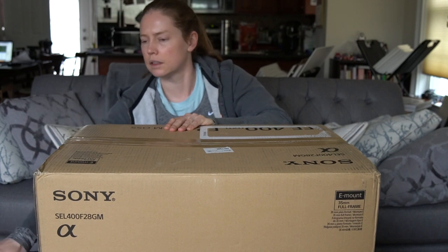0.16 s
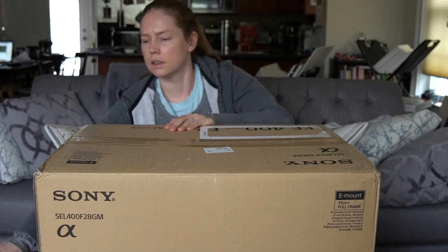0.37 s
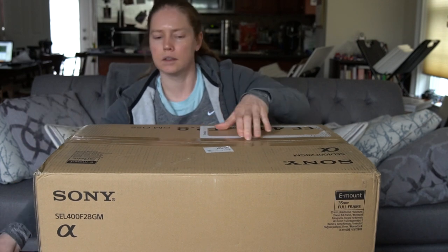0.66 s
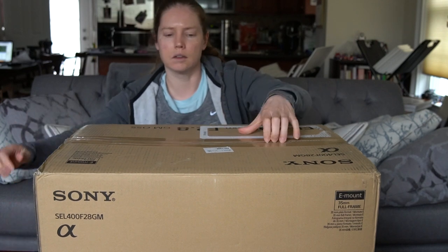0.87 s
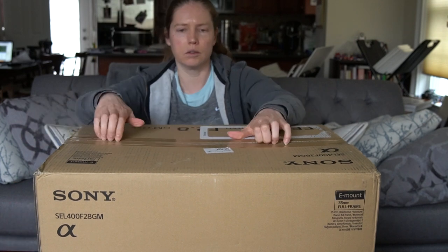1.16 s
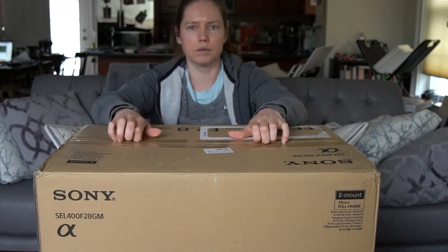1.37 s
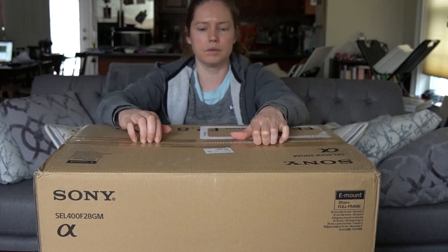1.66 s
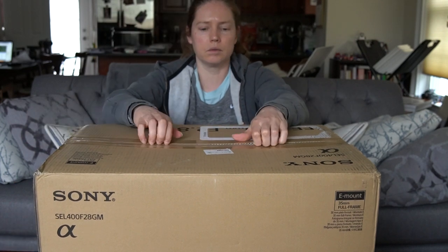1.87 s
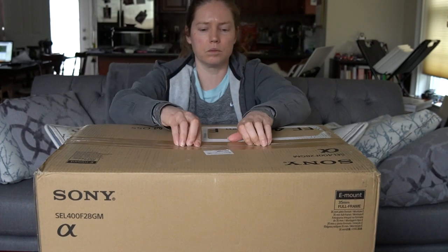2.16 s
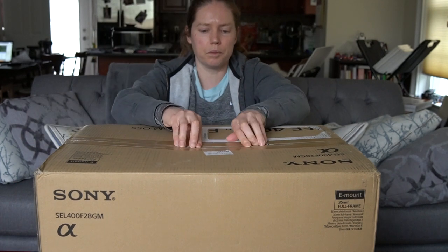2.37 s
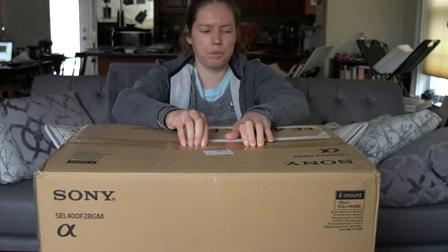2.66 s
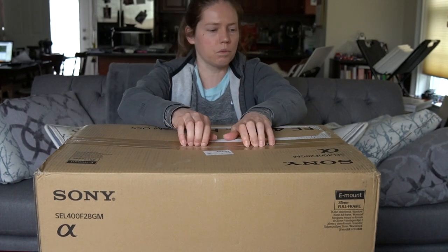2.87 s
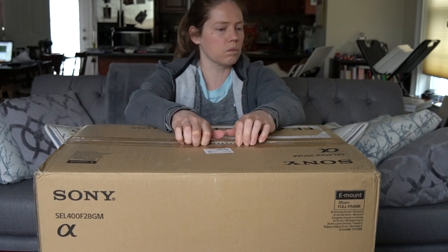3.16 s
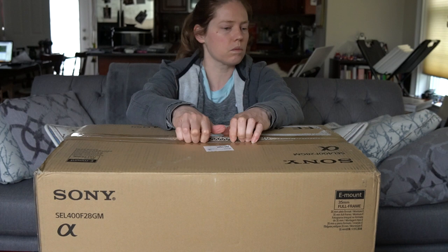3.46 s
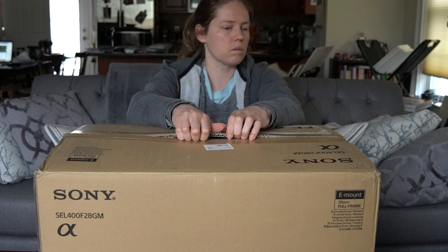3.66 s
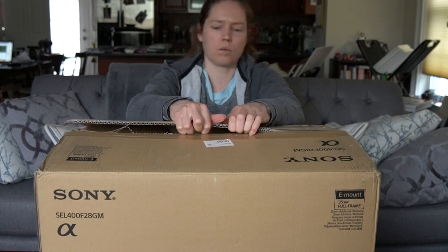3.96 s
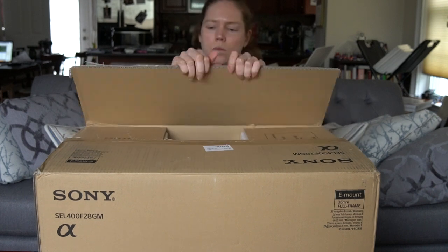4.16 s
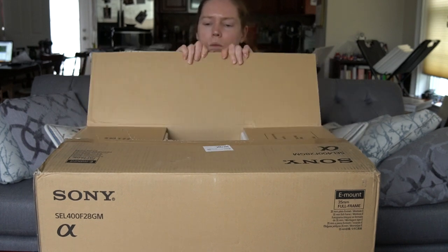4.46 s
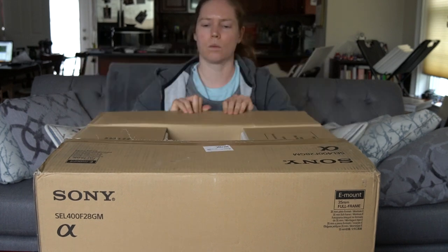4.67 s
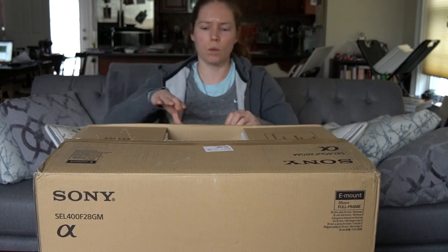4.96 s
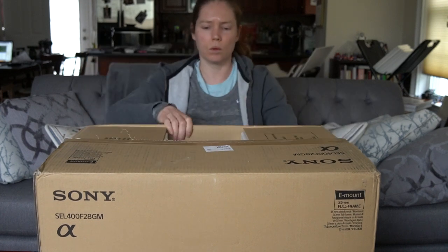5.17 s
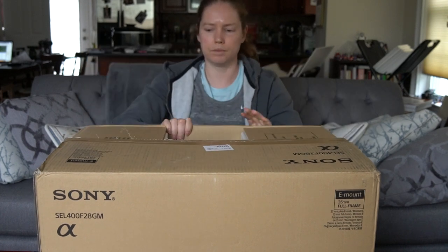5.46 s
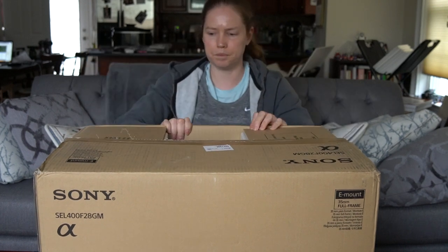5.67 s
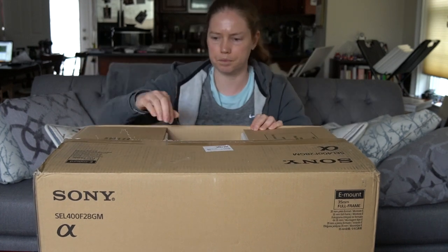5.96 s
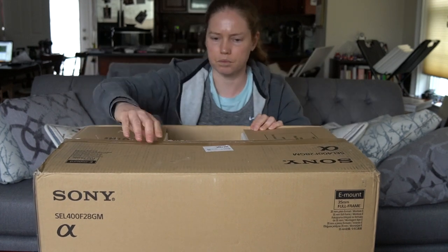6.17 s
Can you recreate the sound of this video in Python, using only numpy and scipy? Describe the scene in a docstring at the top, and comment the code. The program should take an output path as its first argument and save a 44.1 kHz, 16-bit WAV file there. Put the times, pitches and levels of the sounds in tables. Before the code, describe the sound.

Close indoor unboxing: light taps, sputtering tape crackles, a burst of sharp snaps and booming rips near four seconds, then quiet rustles.

```python
"""A large taped cardboard box is opened by hand in a living room, over still air, a deep rumble and a hum.
After small ticks beside the box, hands knock on the lid (dents, ringing plate modes, a low thud) and work
along the seam (filtered random clicks); the packing tape crackles, snaps as short fractures that shake the
panels, and rips in rushes of slips while the air inside booms. Then the flap is folded back, and sleeves
and fingers rub and tap on the cardboard (stick-slip noise, light touches)."""
import sys
import numpy as np
from scipy import signal
from scipy.fft import rfft, irfft
from scipy.io import wavfile

SR = 44100
rng = np.random.default_rng(int(sys.argv[2]) if len(sys.argv) > 2 else 0)


def master_out(mix):
    """Clip the mix to full scale and print it as 16-bit PCM to the path in sys.argv[1]."""
    frames = np.transpose(np.atleast_2d(mix))
    ceiling = np.clip(frames, -1, 1)
    pcm = np.round(ceiling * 32767).astype(np.int16)
    wavfile.write(sys.argv[1], SR, pcm)


N = 278138

# Levels of events and spectra are relative: each sound may add a fixed trim or normalise its sum. # fingers
# brushing the lid, then working along the taped seam: (start [s], end [s], crinkle level [dB])
SEAM_STROKES = [(0.502, 0.574, -59.5), (0.762, 0.865, -58), (0.974, 1.03, -60.5), (1.094, 1.335, -57.5),
                (1.336, 1.395, -52.5), (1.559, 1.66, -57.5), (1.716, 1.847, -48), (1.915, 2.219, -53.5),
                (2.604, 2.723, -57), (2.983, 3.282, -50.5), (3.285, 3.374, -44.5), (3.39, 3.608, -51),
                (3.657, 3.756, -40.5), (4.275, 4.343, -57.5)]
# fingers, hands and flap knocking on the cardboard:
# (time [s], panel flex level over 5 ms [dB], flex pitch [Hz])
LID_KNOCKS = [(0.5622, -22.5, 684), (0.6643, -27.5, 550), (0.6685, -16.5, 496), (0.687, -18, 730),
              (0.7795, -31.5, 446), (0.851, -39, 453), (1.0238, -38, 310), (1.1019, -36.5, 420),
              (1.16, -30, 298.5), (1.1767, -35, 357), (1.3459, -28, 394), (1.4252, -29, 244),
              (1.591, -33, 413), (1.887, -34, 456.3), (2.048, -36, 358), (2.6859, -21.5, 341),
              (3.0549, -35, 650), (3.4756, -33, 490), (3.6412, -34.5, 460), (3.6874, -25, 483),
              (3.813, -21.5, 450), (4.0783, -18, 453), (4.1145, -16, 378), (4.637, -42.5, 396),
              (4.8856, -38, 430), (5.513, -42.5, 181), (5.644, -37.5, 186), (5.698, -40, 348),
              (5.8182, -48.5, 870), (6.01, -44.5, 280), (6.0696, -44.5, 401), (6.259, -42, 370)]
# loud tape snaps: (time [s], crack of the film over 1 ms [dB], clack of the liner over 1 ms [dB],
# jolt of the panel over 5 ms [dB])
TAPE_SNAPS = [(1.236, -29.5, -43, -40.5), (1.2576, -37, -29.5, -47), (1.6608, -18, -27.5, -28),
              (1.7253, -23.5, -33.5, -28.5), (1.797, -22.5, -30, -33.5), (1.8252, -24, -29.5, -35),
              (1.8385, -21.5, -19.5, -15), (1.9514, -33, -32.5, -29), (2.182, -32.5, -31.5, -32.5),
              (2.186, -24.5, -31, -37.5), (2.3597, -19.5, -19.5, -28), (2.3679, -15.5, -22.5, -21.5),
              (2.6638, -31, -30.5, -26.5), (2.729, -26.5, -29, -34), (2.9183, -29.5, -36.5, -40.5),
              (3.0046, -36, -45, -40), (3.0363, -36, -40, -34.5), (3.0415, -20, -26, -30.5),
              (3.096, -21.5, -30.5, -25.5), (3.1867, -33, -32.5, -25), (3.2345, -20, -29, -46),
              (3.2467, -25, -27.5, -43), (3.3203, -27, -28.5, -35), (3.3481, -30.5, -34.5, -37),
              (3.4683, -31, -28.5, -38.5), (3.52, -18.5, -30, -46.5), (3.5547, -18.5, -26.5, -41),
              (3.559, -21, -22.5, -36.5), (3.5829, -29, -31.5, -42.5), (3.7185, -26.5, -23, -42.5),
              (3.7391, -12.5, -14.5, -27.5), (3.7571, -21, -21.5, -30), (3.764, -17, -29, -35),
              (3.8044, -23, -21, -31.5), (3.8211, -14.5, -14, -19), (3.8431, -18, -24.5, -30),
              (3.8618, -24.5, -26, -35), (3.8728, -11, -10, -18), (3.8805, -16, -14.5, -17.5),
              (3.94, -25.5, -23, -21.5), (4.0387, -26, -43, -43.5), (4.0633, -16, -19.5, -28.5),
              (4.0738, -7, -5, -7), (4.0947, -25.5, -14.5, -23), (4.207, -33, -29.5, -33),
              (4.2914, -34, -31.5, -48)]
# resonant modes of the panels: (frequency [Hz], level [dB], T60 [s])
PLATE_MODES = [(178.3, 1.5, 0.21), (232.5, -3.5, 0.37), (300.7, 3, 0.18), (345.6, -1.5, 0.11),
               (422, -14.5, .11), (719.4, -7, 0.12), (825.5, -12.5, 0.08), (990, -2.5, 0.077),
               (1384, -15, 0.11)]
# spectrum of tape film cracking: (frequency [Hz], density [dB per Hz])
CRACK_SPECTRUM = [(2500, -28.5), (4500, -8), (6500, 1.5), (8500, 1.5), (16000, -9.5)]
# spectrum of the liner or a hard contact clacking: (frequency [Hz], density [dB per Hz])
CLACK_SPECTRUM = [(500, -19.5), (1100, -1), (1600, -4), (2800, -2.5), (4800, -2.5), (6500, -14),
                  (12000, -22)]
# spectrum of crinkling tape and tearing fibres: (frequency [Hz], density [dB per Hz])
CRINKLE_SPECTRUM = [(600, -19), (1300, 6), (2500, -7), (4500, -1), (8000, 0.5), (16000, -6)]


def from_db(db):
    """The decibel is logarithmic: 20 dB is a factor of ten in amplitude."""
    return np.exp(np.asarray(db) * (np.log(10) / 20))


def rms_one(x):
    """Normalise the mean power, so that rms is 1."""
    return x / np.sqrt(np.mean(x ** 2) + 1e-20)


def packed(x, span):
    """Normalise a pulse to the energy of rms 1 held for span seconds."""
    return x * np.sqrt(span * SR / (np.sum(x ** 2) + 1e-20))


def seconds(length):
    """Time axis sampled at SR."""
    return np.arange(int(length * SR)) / SR


def at_hz(points, hz):
    """Interpolate a table on a logarithmic frequency axis, as pitch is heard."""
    f, value = np.transpose(points)
    return np.interp(np.log(np.maximum(hz, 1)), np.log(f), value)


def gains(rows):
    """Level curves, linear in decibels, as gains that fade out beyond their ends."""
    s, *columns = np.transpose(rows)
    t = np.arange(N) / SR
    inside = np.interp(t, [s[0] - .04, s[0], s[-1], s[-1] + .04], [0, 1, 1, 0])
    return [inside * from_db(np.interp(t, s, c)) for c in columns]


def add(track, s, sound):
    """Superpose a sound at time s."""
    i = max(round(s * SR), 0)
    track[i:i + len(sound)] += sound[:max(N - i, 0)]


def colour(x, spectrum):
    """Minimum-phase filter: folding the cepstrum makes the given spectrum causal."""
    size = 1024 if len(x) < 4096 else 4096 if len(x) < SR else 32768
    log_gain = at_hz(spectrum, np.fft.rfftfreq(size, 1 / SR)) * np.log(10) / 20
    cepstrum = irfft(log_gain)
    cepstrum[1:size // 2] *= 2
    cepstrum[size // 2 + 1:] = 0
    response = irfft(np.exp(rfft(cepstrum)))
    return signal.fftconvolve(x, response)[:len(x)]


def drift(rate):
    """Slow random modulation: bounded noise values, rate per second, joined by straight lines."""
    values = np.clip(rng.standard_normal(4096), -2, 1.5)
    return np.interp(np.arange(N) / SR * rate, np.arange(4096), values)


def ring(t, hz, t60, phase=0):
    """Free decay of a damped resonator: a sine that loses 60 dB in t60."""
    return np.sin(2 * np.pi * hz * t + phase) * from_db(-60 * t / t60)


def grains(per_s, spread_db, size):
    """Shot noise: random clicks of uneven size, rms 1."""
    born = rng.random(size) < per_s / SR
    excess = np.minimum(rng.exponential(1, size), 4)
    return rms_one(born * rng.choice([-1, 1], size) * from_db(spread_db * excess))


def background():
    """Steady noise floor: still room air, a deep wavering rumble and a faint pure hum."""
    # still air: (frequency [Hz], density [dB per Hz])
    air_spectrum = [(40, -9.5), (75, 0.5), (125, -11.5), (210, 1), (300, -5.5), (400, -8.5), (600, -7.5),
                    (1000, -16.5), (3000, -28), (12000, -39)]
    # swell of the deep rumble: (time [s], level [dB])
    rumble_swell = [(0, -1.5), (2.4, 9), (2.9, 14), (3.3, 5.5), (4.9, 1), (5.35, 15), (5.8, 7.5),
                    (6.3, 13.5)]
    air_db, rumble_db, hum_hz, hum_db = -62, -64, 384, -69.5
    air = from_db(air_db) * rms_one(colour(rng.standard_normal(N), air_spectrum))
    deep_spectrum = [(5, -13.5), (17, 2.5), (32, -9.5), (70, -18.5), (130, -36.0), (600, -77.5)]
    deep = rms_one(colour(rng.standard_normal(N), deep_spectrum))
    rumble = from_db(rumble_db) * gains(rumble_swell)[0] * deep
    hum = np.sqrt(2) * np.sin(2 * np.pi * hum_hz * np.arange(N) / SR)   # rms 1
    return air + rumble + from_db(hum_db) * hum


def burst(spectrum, t60, scatter_db, scatter_t60, edge_db=7):
    """A sudden fracture: one sharp edge, a short splutter, then its scatter through the board."""
    t = seconds(.04)
    envelope = from_db(-60 * t / t60) + from_db(scatter_db - 60 * t / scatter_t60)
    splutter = rng.standard_normal(len(t)) * envelope
    splutter[0] = from_db(edge_db) * rng.choice([-1, 1])
    x = colour(splutter, spectrum)
    # the first 66 samples carry the energy of rms 1 held for 1 ms
    return x * np.sqrt(SR / 1000 / np.sum(x[:66] ** 2))


def ticks():
    """Hard impacts excite a broad spectrum: small ticks beside the box."""
    # small hard ticks: (time [s], level over 1 ms [dB])
    tick_rows = [(.132, -63.5), (0.177, -36), (0.21, -43.5), (0.295, -51.5), (0.3814, -29.5)]
    # spectrum of the ticks: (frequency [Hz], density [dB per Hz])
    tick_spectrum = [(1100, -11), (1950, -1), (2800, -13.5), (4000, 3), (5500, -6.5), (8200, -5.5),
                     (15000, -9.5)]
    out = np.zeros(N)
    for s, db in tick_rows:
        add(out, s, from_db(db) * burst(tick_spectrum, t60=0.0074, scatter_db=-9.5, scatter_t60=0.034))
    return out


def room():
    """Diffuse reflections build up over some milliseconds and decay exponentially, band by band."""
    # decay of the room: (frequency [Hz], T60 [s])
    decay_times = [(100, 0.1), (400, 0.24), (1500, 0.46), (4000, 0.3), (8000, 0.4), (15000, 0.26)]
    # strength of the reverberation: (frequency [Hz], level [dB])
    reverb_levels = [(60, -12.5), (250, -12.5), (800, -8.5), (2000, -9), (5000, -10), (8500, -13),
                     (15000, -15)]
    t = seconds(.7)
    white = rng.standard_normal((2, len(t)))
    edges = 45 * 2 ** np.arange(0, 9, .5)   # half-octave bands
    build = np.clip((t - .004) / 0.0075, 0, 1)
    response = 0
    for k, (low, high) in enumerate(zip(edges, edges[1:])):
        hz = np.sqrt(low * high)
        t60 = np.clip(at_hz(decay_times, hz), .08, .6)
        decay = build * from_db(-60 * t / t60)
        bandpass = signal.butter(2, [low, high], "band", fs=SR, output="sos")
        band = signal.sosfilt(bandpass, white[k % 2])
        level = from_db(at_hz(reverb_levels, hz))
        response = response + band * decay / np.sqrt(np.sum(decay ** 2)) * level
    return response


def stroke(start, end, attack_s, release_s):
    """One hand movement: linear attack, hold, exponential release; and the samples it covers."""
    first = max(int((start - attack_s / 2) * SR), 0)
    last = min(int((end + 10 * release_s) * SR), N)
    i = np.arange(first, last)
    t = i / SR
    attack = np.clip(.5 + (t - start) / attack_s, 0, 1)
    return i, attack * np.exp(-np.maximum(t - end, 0) / release_s)


def panel_ring(x):
    """Forced vibration: convolving x with the panel modes rings them, with the same energy as x."""
    t = seconds(.25)
    modes = sum(from_db(db) * (-1) ** k * ring(t, hz, t60) for k, (hz, db, t60) in enumerate(PLATE_MODES))
    return rms_one(signal.fftconvolve(x, modes)[:len(x)]) * np.sqrt(np.mean(x ** 2))


def friction():
    """Stick-slip: strained tape crinkles in clumps, cloth and board hiss as they slide, panels judder."""
    # sleeves and flap sliding:
    # (start [s], end [s], cloth hiss level [dB], hiss centre [Hz], board scrape level [dB])
    slide_rows = [(4.424, 4.485, -52.5, 4300, -61), (4.546, 4.648, -54.5, 5540, -60),
                  (4.657, 4.744, -46.5, 5170, -55), (4.863, 5.035, -54.5, 5500, -49.5),
                  (5.054, 5.109, -49, 6000, -50.5), (5.145, 5.359, -60, 6500, -62.5),
                  (5.383, 5.455, -68.5, 4500, -64), (5.634, 5.94, -62.5, 7330, -59.5),
                  (6.011, 6.113, -79.5, 9020, -67.5), (6.235, 6.31, -61.5, 10100, -63)]
    # load of the hands on the panels, as the level of their judder: (time [s], level [dB])
    strain = [(0.55, -71), (0.74, -48), (0.89, -56.5), (1.81, -49), (2.33, -54), (3.0, -55), (3.14, -49.5),
              (3.54, -56.5), (3.98, -44), (4.34, -60.5), (4.98, -55.5), (5.37, -67), (5.85, -58.5),
              (6.3, -66)]
    # spectrum of rubbing cloth: (frequency [Hz], density [dB per Hz])
    rub_spectrum = [(600, -7), (1300, -3.5), (2600, -6), (4400, -2), (6500, -3), (8500, -8), (16000, -6)]
    # spectrum of board sliding on board: (frequency [Hz], density [dB per Hz])
    scrape_spectrum = [(200, 2), (400, 3.5), (800, 3.5), (1400, -1), (2500, -8.5), (6000, -14.5)]
    # spectrum of the juddering panels: (frequency [Hz], density [dB per Hz])
    panel_spectrum = [(50, -10.5), (115, -12), (180, -3.5), (236, 0.5), (265, -1), (301, -2.5), (500, -14),
                      (800, -13), (1300, -28.5), (6000, -30)]
    judder_trim_db, judder_ring_db = -1.5, -8

    crackle = grains(per_s=770, spread_db=5.0, size=N) * from_db(7.4 * drift(45))
    crinkle_source = rms_one(crackle) + 0.62 * rng.standard_normal(N)
    crinkle = rms_one(colour(crinkle_source, CRINKLE_SPECTRUM))

    catch = drift(45)   # sliding surfaces catch and slip
    fibre_slips = grains(per_s=7000, spread_db=2.0, size=N) * from_db(1.9 * catch)
    fibres = colour(fibre_slips, rub_spectrum)
    board_slips = grains(per_s=1200, spread_db=2.0, size=N) * from_db(4.1 * catch)
    scrape = rms_one(colour(board_slips, scrape_spectrum))

    panel_slips = grains(per_s=1200, spread_db=2.5, size=N) * from_db(3.0 * drift(30))
    judder = rms_one(colour(panel_slips, panel_spectrum))
    ringing_judder = rms_one(judder + from_db(judder_ring_db) * panel_ring(judder))
    out = from_db(judder_trim_db) * gains(strain)[0] * ringing_judder

    for start, end, db in SEAM_STROKES:
        i, swell = stroke(start, end, attack_s=.022, release_s=.009)
        out[i] += from_db(db - 0.5) * swell * crinkle[i]
    for start, end, hiss_db, hz, scrape_db in slide_rows:
        i, swell = stroke(start, end, attack_s=0.046, release_s=0.024)
        hiss = rms_one(colour(fibres[i], [(hz * 0.58, -5), (hz, 0), (hz * 1.87, -5)]))
        out[i] += swell * (from_db(hiss_db) * hiss + from_db(scrape_db) * scrape[i])
    return out


def snap(spectrum, t60, scatter_db, scatter_t60, low_hz, high_hz, peak_db):
    """Size sets resonance: every torn patch has a size, and so a narrow spectral peak, of its own."""
    centre = low_hz * (high_hz / low_hz) ** rng.random()
    hz = np.geomspace(300, 17000, 40)
    bump = peak_db * np.exp(-(np.log2(hz / centre) / 0.08) ** 2)
    return burst(np.c_[hz, at_hz(spectrum, hz) + bump], t60, scatter_db, scatter_t60)


def crackles():
    """Random point process: tiny patches of tape give under the fingers and in a cluster round each snap."""
    # rate and crinkle level of a firm stroke
    firm_rate_per_s, firm_stroke_db = 55, -50
    # level over the crinkle, and scale of the random excess of the bigger crackles
    over_crinkle_db, excess_db = 7, 4.5
    # round a snap: earliest lead, latest lag, mean level relative to its crack
    cluster_lead_s, cluster_lag_s, cluster_db = .007, .022, -14
    rows = []
    for start, end, db in SEAM_STROKES:
        wait, size = rng.exponential(1, (32, 2)).T
        rate_per_s = firm_rate_per_s * from_db(db - firm_stroke_db)   # a harder stroke crackles faster
        times = start + np.cumsum(wait) / rate_per_s
        levels_db = db + over_crinkle_db + excess_db * np.minimum(size, 2.5)
        rows += [row for row in zip(times, levels_db) if row[0] < end]
    for s, crack_db, _, _ in TAPE_SNAPS:
        for lag in rng.uniform(-cluster_lead_s, cluster_lag_s, size=2):
            rows.append((s + lag, crack_db + cluster_db + 3 * rng.normal()))
    out = np.zeros(N)
    for s, db in rows:
        crackle = snap(CRACK_SPECTRUM, t60=.003, scatter_db=-24, scatter_t60=.025,
                       low_hz=3800, high_hz=11000, peak_db=9)
        add(out, s, from_db(db) * crackle)
    return out


def flex(hz, cycles, modes_db, waves_db, waves_t60):
    """Plate under impact: a local dent, bending waves that spread from it, and the panel modes ringing."""
    # a plate radiates little below its own pitch: (frequency [Hz], gain [dB])
    radiation = [(15, -43), (40, -23.5), (110, -18), (180, -1.5)]
    # what the hollow lid passes on from a blow: (frequency [Hz], gain [dB])
    lid_response = [(150, 3), (330, -2), (520, -3), (700, -1), (900, 2.5), (1120, -5.5), (1600, 1.5),
                    (3000, -5.5)]
    t = seconds(.2)
    dent = packed(colour(ring(t, hz, cycles / hz), radiation), .005)
    modes = 0
    for f, db, t60 in PLATE_MODES:
        share = from_db(db) / (1 + np.log2(f / hz) ** 2)   # modes near the pitch of the blow take most
        modes = modes + share * rng.normal() * ring(t, f * (1 + .012 * rng.normal()), t60)
    spread = rng.standard_normal(len(t)) * from_db(-60 * t / waves_t60) * (1 - np.exp(-t / 0.0022))
    around_pitch = [(hz * 0.31, -24), (hz * 0.42, -1), (hz, 0), (hz * 1.73, -4), (hz * 3.48, -16), (hz * 12, -45)]
    waves = colour(colour(spread, lid_response), around_pitch)
    ringing = from_db(modes_db) * packed(modes, .005) + from_db(waves_db) * packed(waves, .005)
    return rng.choice([-1, 1]) * dent + ringing


def knocks(rows):
    """Contact stiffness: blunt contacts bend the board more, hard ones sound higher and clack more."""
    # pitch at which clack equals flex before their trims, and the clack's rise with pitch
    hard_hz, clack_db_per_octave = 590, 14
    out = np.zeros(N)
    for s, flex_db, hz in rows:
        clack_db = flex_db + clack_db_per_octave * np.log2(hz / hard_hz)
        clack = burst(CLACK_SPECTRUM, t60=0.0038, scatter_db=-16.5, scatter_t60=0.041)
        bend = flex(hz, cycles=6.9, modes_db=-4.0, waves_db=-0.5, waves_t60=0.058)
        add(out, s, from_db(clack_db - 4.0) * clack)
        add(out, s, from_db(flex_db - 3.5) * bend)
    return out


def lid_thuds():
    """Low plate resonance: under every knock the lid sags and springs back, soft hand or hard knuckle."""
    middle_hz, t60 = 135, .09
    # level for a knock of 0 dB, and rise in dB per dB of the knock
    thud_db, follows = -30, .4
    out, t = np.zeros(N), seconds(.2)
    for s, flex_db, _ in LID_KNOCKS:
        hz = middle_hz * 2 ** (.2 * rng.normal())
        thud = ring(t, hz, t60) * (1 - np.exp(-t / 0.0052))
        add(out, s, from_db(thud_db + follows * flex_db) * thud)
    return out


def patter():
    """Irregular impact train: light fingertip touches, each with its own strength and pitch, as knock rows."""
    # fingertips while the hands find their grip:
    # (start [s], end [s], middle panel flex level [dB], middle flex pitch [Hz])
    patter_rows = [(.72, .82, -38.5, 537), (1.17, 1.39, -40.5, 398), (2.07, 2.21, -42, 246),
                   (2.61, 2.72, -38.5, 558), (5.6, 5.96, -49, 300), (6.07, 6.12, -45.5, 330)]
    touches_per_s, spread_db, spread_octaves = 24, 6.5, 1   # full widths of the spreads
    rows = []
    for start, end, db, hz in patter_rows:
        when, strength, pitch = rng.random((24, 3)).T
        times = start + (np.arange(len(when)) + when) / touches_per_s
        levels_db = db + spread_db * (strength - .5)
        pitches = hz * 2 ** (spread_octaves * (pitch - .5))
        rows += [row for row in zip(times, levels_db, pitches) if row[0] < end]
    return rows


def tape_snaps():
    """Sudden release of strain: each snap is a crack of the film, a clack of the liner and a panel jolt."""
    out = np.zeros(N)
    for s, crack_db, clack_db, flex_db in TAPE_SNAPS:
        # a deeper jolt moves more board and sounds lower
        hz = np.clip(480 * 2 ** ((clack_db - flex_db) / 20), 280, 900)
        crack = snap(CRACK_SPECTRUM, t60=0.0026, scatter_db=-24.5, scatter_t60=0.051,
                     low_hz=5400, high_hz=13070, peak_db=4.0)
        clack = snap(CLACK_SPECTRUM, t60=.0022, scatter_db=-14.5, scatter_t60=0.043,
                     low_hz=1300, high_hz=5840, peak_db=1.5)
        jolt = flex(hz, cycles=2.2, modes_db=-0.5, waves_db=-2.0, waves_t60=0.061)
        add(out, s, from_db(crack_db - 0.2) * crack)
        add(out, s, from_db(clack_db - 0.88) * clack)
        add(out, s, from_db(flex_db - 4.0) * jolt)
        # a few fibres give just before the patch does
        fibres = burst(CRINKLE_SPECTRUM, t60=.003, scatter_db=-11, scatter_t60=.012)
        add(out, s - rng.uniform(.001, 0.0036), from_db(crack_db - 16.5) * fibres)
    return out


def box_air():
    """Cavity resonance: the air in the box booms at two close pitches when the flap moves suddenly."""
    # the flap pumps the air in the box: (time [s], level [dB])
    pump_rows = [(1.348, -41.5), (1.429, -43.5), (1.840, -34), (3.815, -26), (3.874, -32), (4.076, -27.5),
                 (4.09, -22), (5.645, -42)]
    out, t = np.zeros(N), seconds(.5)
    boom = (ring(t, hz=63, t60=0.24) + ring(t, hz=71.4, t60=0.33)) / 2 * (1 - np.exp(-t / 0.0029))
    for s, db in pump_rows:
        add(out, s, from_db(db) * boom)
    return out


def rips():
    """A rush of tiny slips as the tape lets go swells quickly, dies away and leaves the panels ringing."""
    # runs of tape letting go: (time [s], length [s], level [dB])
    rip_rows = [(1.841, 0.017, -34.5), (3.742, 0.015, -34), (3.815, 0.019, -21), (3.866, 0.018, -16.5),
                (3.939, 0.012, -33.5), (4.067, 0.015, -20.5), (4.079, 0.027, -26), (4.105, 0.05, -29.5)]
    # spectrum of the slips: (frequency [Hz], density [dB per Hz])
    rip_spectrum = [(40, -31), (130, -6), (240, 14), (500, 2), (850, 2), (1300, 5.5), (2500, -7),
                    (4000, -0.5), (6500, -0.5), (16000, -18)]
    ring_db = -7.5   # ringing of the panel modes relative to the slips
    out, t = np.zeros(N), seconds(.25)
    for s, length, db in rip_rows:
        swell = np.interp(t / length, [0, .15, .6, 1.3], [0.064, 0.91, 0.89, 0.036])
        slips = rms_one(colour(grains(per_s=1800, spread_db=1, size=len(t)), rip_spectrum))
        rush = swell * slips
        add(out, s, from_db(db) * (rush + from_db(ring_db) * panel_ring(rush)))
    return out


def scene():
    """Direct and reverberant field: the box close to the microphone, the room around it."""
    air, aside, walls = background(), ticks(), room()
    box = friction() + crackles() + knocks(LID_KNOCKS) + lid_thuds() + knocks(patter())
    box = box + tape_snaps() + box_air() + rips()
    # the ticks lie off to the side, so more of them arrives by way of the room
    reverberant = signal.fftconvolve(box + from_db(5.0) * aside, walls)[:N]
    return (box + aside + reverberant + air)[None]


def record(dry):
    """Transducer response: microphone colour, clipping at full scale, and a steep low-pass."""
    # microphone colour: (frequency [Hz], gain [dB])
    microphone = [(5000, 1), (6400, -1), (7500, 1.5), (8600, 4), (9900, -7), (11200, -3.5), (13200, 0),
                  (15500, -10), (17000, -20)]
    cutoff_hz = 16200
    loud = np.clip(colour(dry[0], microphone), -1, 1)
    lowpass = signal.ellip(10, .1, 80, cutoff_hz, fs=SR, output="sos")
    return signal.sosfilt(lowpass, loud)[None]


dry = scene()
out = record(dry)
master_out(out)
```